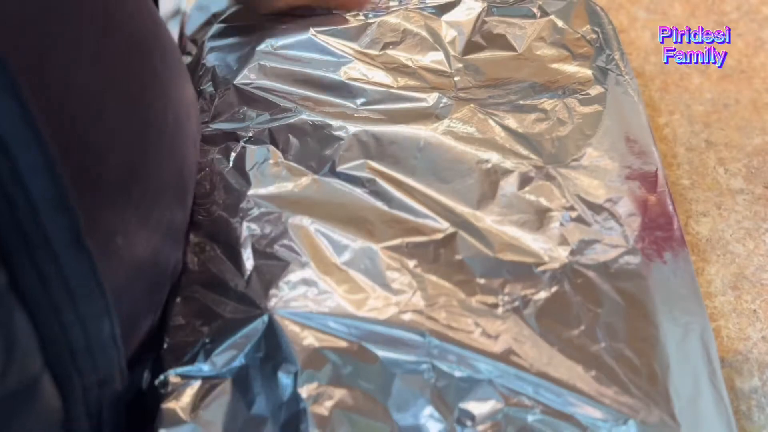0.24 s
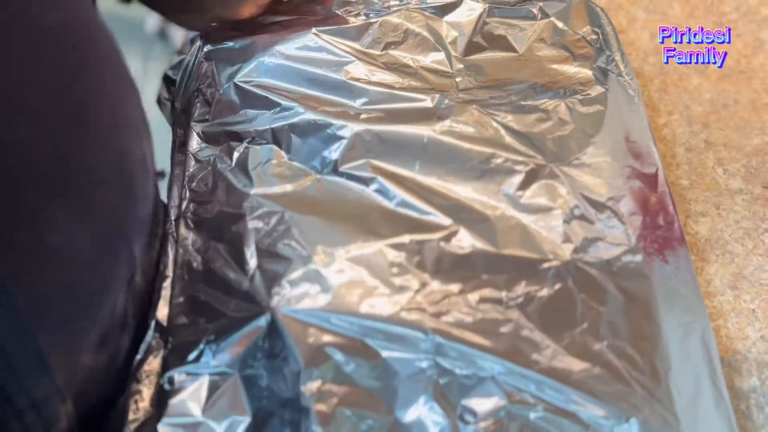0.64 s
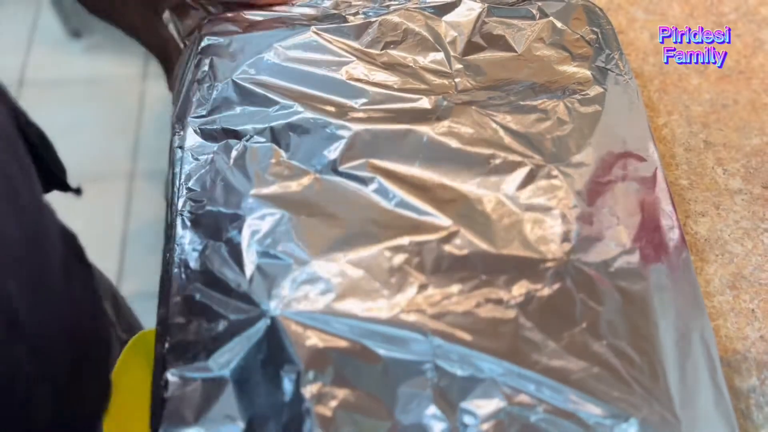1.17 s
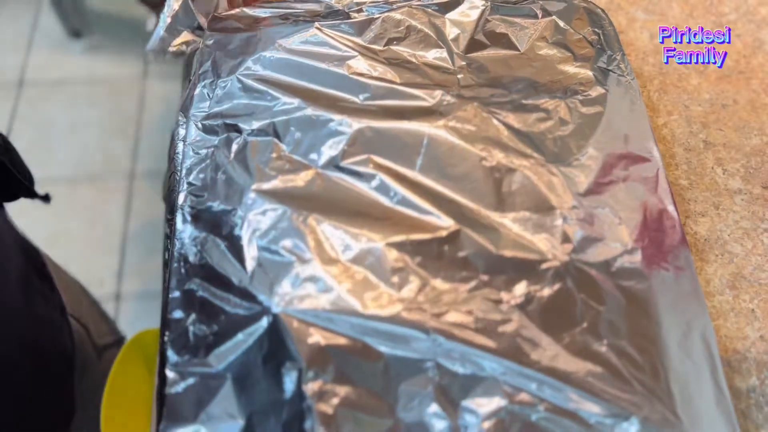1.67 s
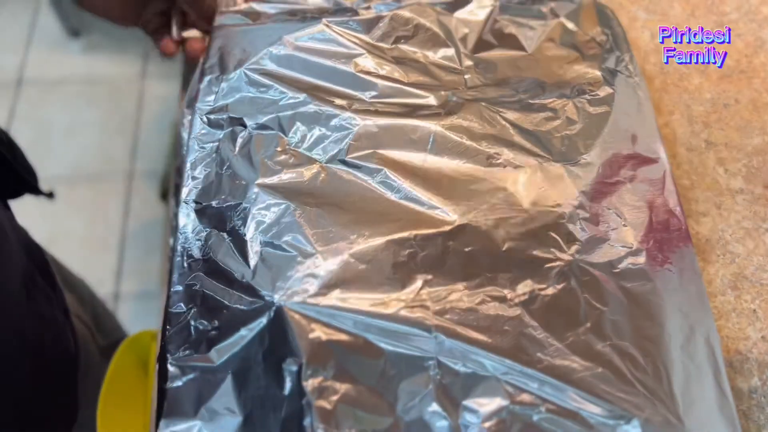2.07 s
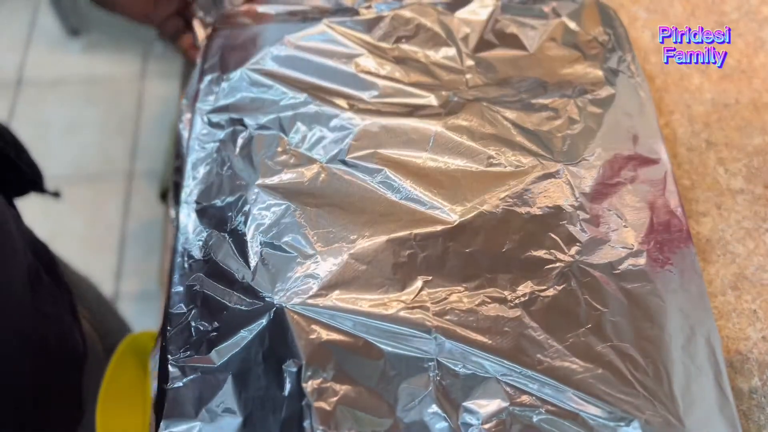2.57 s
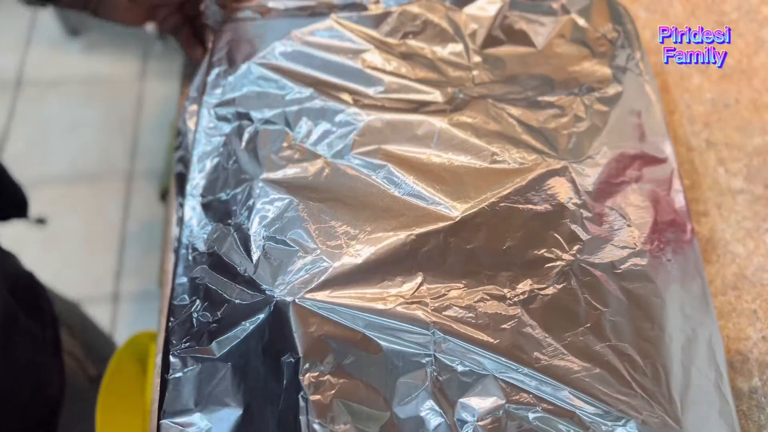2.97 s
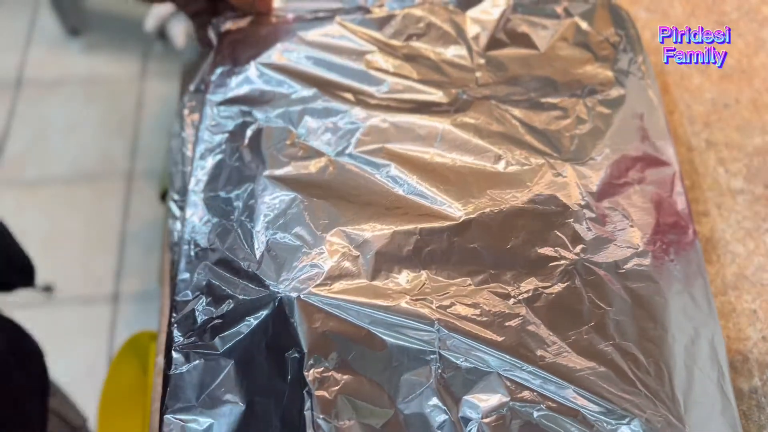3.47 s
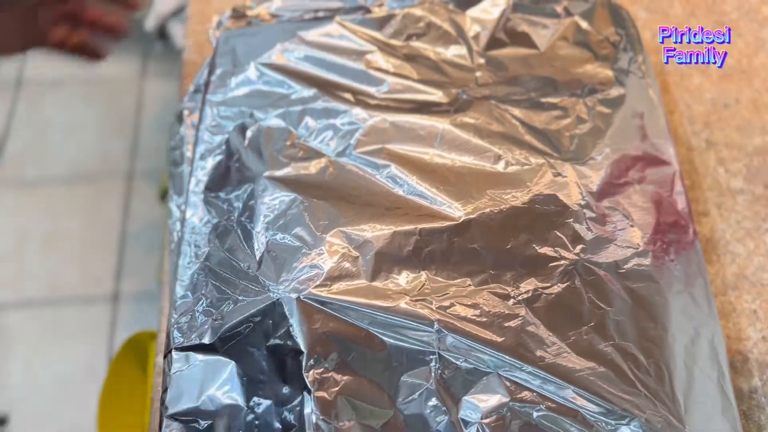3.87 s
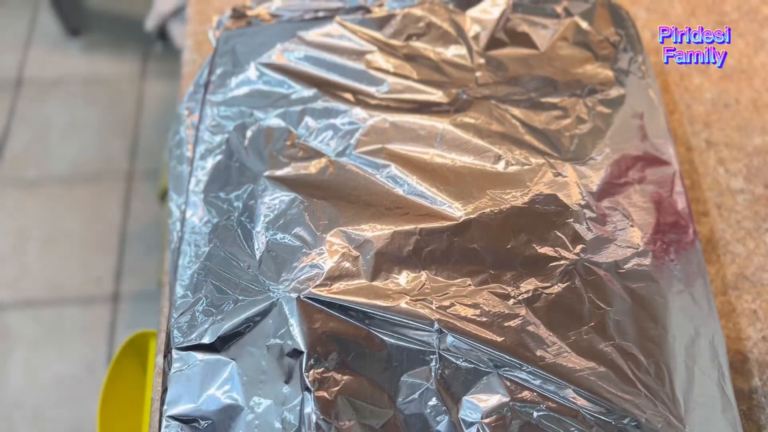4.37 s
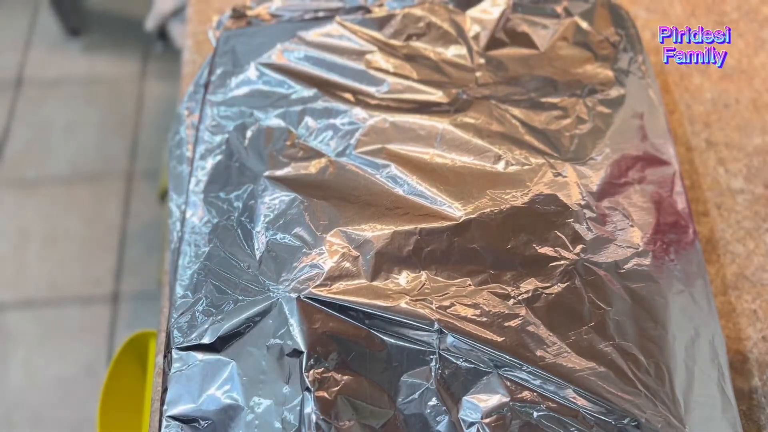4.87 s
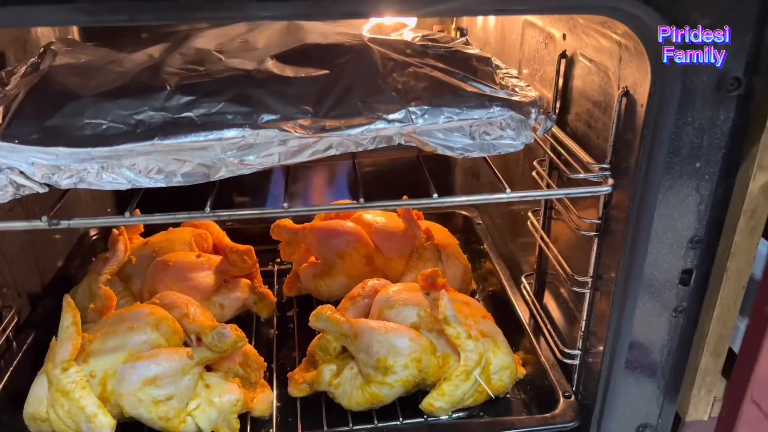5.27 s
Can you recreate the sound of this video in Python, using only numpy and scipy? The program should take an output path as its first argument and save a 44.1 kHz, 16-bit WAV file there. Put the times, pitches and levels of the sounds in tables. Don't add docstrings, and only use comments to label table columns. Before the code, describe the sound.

In a small kitchen, close stereo microphones catch hands crimping foil over a baking tray: dense bright crackle, sharp creases snapping, panels popping and low tray booms. After nearly four seconds it quietens to tiny ticks and soft worktop knocks over a faint fridge hum. At five seconds the scene cuts to an open gas oven, breathing softly, with a metal rack tapped once.

```python
import sys
import numpy as np
from scipy import signal
from scipy.fft import rfft, irfft, next_fast_len
from scipy.io import wavfile
from scipy.ndimage import uniform_filter1d

SR = 44100
rng = np.random.default_rng(int(sys.argv[2]) if len(sys.argv) > 2 else 0)


def gain_from_db(level_db):
    decades = np.asarray(level_db, float) / 20
    return 10 ** decades


def wrap_up_sound(samples):
    columns = np.atleast_2d(samples).T
    tamed = np.clip(columns, -1, 1)
    steps = np.round(tamed * 32767).astype(np.int16)
    wavfile.write(sys.argv[1], SR, steps)


N = 244314
CUT_S, RESUME_S = 4.976, 4.981
SWING_DB = 20


def evened(x):
    return x / np.sqrt(np.mean(x ** 2) + 1e-20)


def read(points, hz):
    f, value = np.transpose(points)
    return np.interp(np.log(hz + 1), np.log(f + 1), value)


def add(mix, s, sound):
    part = mix[..., round(s * SR):][..., :sound.shape[-1]]
    part += sound[..., :part.shape[-1]]


def ring(x, hz, width):
    r = np.exp(-np.pi * width / SR)
    return evened(signal.lfilter([1, 0, -1], [1, -2 * r * np.cos(2 * np.pi * hz / SR), r * r], x))


def hiss(points, low_hz):
    hz = np.fft.rfftfreq(N, 1 / SR)
    z = rfft(rng.standard_normal((2, N))) * gain_from_db(read(points, hz))
    return irfft(z, N) / np.std(irfft(z * (hz > low_hz), N))


def wander(per_s):
    size = int(SR / per_s)
    return evened(uniform_filter1d(uniform_filter1d(rng.standard_normal(N), size), size))


def swells(s, rise, fall, *levels_db):
    late = np.arange(0, N / SR, .001) - s[:, None]
    shape_db = -SWING_DB * np.maximum(-late / abs(rise[:, None]), late / abs(fall[:, None]))
    return gain_from_db(np.array(levels_db)) ** 2 @ gain_from_db(shape_db) ** 2


def per_sample(power):
    ms = np.arange(N) / SR * 1000
    return [np.interp(ms, np.arange(len(p)), 10 * np.log10(p + 1e-20)) for p in power]


def struck(rows, t60, scuff, second, third):
    out, t = np.zeros((2, N)), np.arange(6000) / SR
    for s, db, hz, pan_db, tick_db in rows:
        body = np.sin(2 * np.pi * hz * t)
        body = body + second * np.sin(2 * np.pi * 2.2 * hz * t)
        body = body + third * np.sin(2 * np.pi * 3.4 * hz * t)
        noise = rng.standard_normal((2, 2, len(t)))
        tick = ring(ring(noise[1], 1500, 1200.0), 1300, 1100.0)
        body = body + scuff * ring(noise[0], 0.9 * hz, 610.0) + gain_from_db(tick_db - 60 * t / 0.045) * tick
        level_db = db - 2.0 - 60 * t / t60 + np.array([[pan_db], [-pan_db]]) / 2
        add(out, s, gain_from_db(level_db) * body * np.minimum(t / 0.0022, 1))
    return out


# start_s [s], rustle_db [dB],
# large_facet_share_db [dB]
REST = [(0.0, -45, 0), (0.62, -55.5, -1), (0.83, -41, -1.5), (0.87, -34.5, -6), (1.62, -37.5, -4),
        (1.679, -47, -8), (1.755, -51, -7.5), (1.9, -35, -6.5), (2.05, -31.5, -8.5), (2.18, -48, -7),
        (2.5, -42.5, -4), (3.45, -46, -5), (3.78, -68, 5), (4.3, -66, -3), (4.5, -66, -2), (4.58, -79, 4.5),
        (4.73, -79, 6), (4.76, -63.5, -6), (4.97, -62.5, -9)]
# peak_s [s], level_db [dB], build_up_s [s], release_s [s], large_facet_share_db [dB]
SQUEEZES = [(0.0, -32, .02, 0.071, -1.5), (0.075, -37, 0.076, 0.11, -15), (0.23, -32.5, 0.39, 0.44, -0.5),
            (0.291, -27, 0.048, 0.36, -4.5), (0.45, -29, 0.087, 0.04, -12.5),
            (0.565, -36.5, 0.033, 0.062, -8), (0.728, -31.5, .2, 0.093, -3.5), (1.03, -30, 0.13, 0.28, -6),
            (1.41, -33.5, 0.29, 0.23, -7.5), (1.62, -38.5, 0.17, 0.033, -6),
            (1.79, -40.5, 0.04, 0.12, -5.5), (1.87, -32.5, 0.12, 0.14, -4.5), (1.972, -32, .02, .04, -9),
            (2.059, -26.5, 0.03, 0.093, -9), (2.33, -36.5, .04, .2, -10), (2.51, -36.5, 0.066, 0.3, -10),
            (2.61, -37, 0.11, 0.59, -7.5), (2.784, -31, 0.045, 0.032, -10.5),
            (2.89, -35.5, 0.11, 0.034, -3), (2.96, -36.5, 0.073, 0.3, -7.5), (3.111, -35, .012, 0.4, -5.5),
            (3.279, -34.5, 0.07, 0.032, -9), (3.42, -39, 0.017, 0.21, 1),
            (3.471, -35.5, 0.087, 0.19, -10.5), (3.9, -56.5, 0.055, 0.12, 6.5),
            (3.99, -56, 0.15, 0.13, 6.5), (4.2, -52.5, 0.23, .11, -3)]


def hands():
    s, db, rise, fall, share_db = np.transpose(SQUEEZES)
    at, rest_db, rest_share_db = np.transpose(REST)
    ms = np.arange(0, N / SR, .001)
    rest = [np.interp(ms, at, c) for c in (rest_db, rest_db + rest_share_db)]
    power = swells(s, rise, fall, db, db + share_db) + gain_from_db(np.array(rest)) ** 2
    crinkle_db, deep_db = per_sample(power)
    deep_db = deep_db - crinkle_db
    palm_db = -19 * (abs(np.arange(N) / SR - (3.72 + 4.35) / 2) < (4.35 - 3.72) / 2)
    return crinkle_db, deep_db, .5 * crinkle_db - 0.4 * deep_db + palm_db


# start_s [s], level_db [dB, peak], deep_db [dB, relative], length_s [s]
SNAPS = [(0.288, -18.5, -4, 0.0074), (0.314, -24, -7, 0.006), (0.34, -22.5, -9, 0.016),
         (0.439, -23, -12, 0.013), (0.567, -22, -27, 0.0033), (0.842, -21.5, -7, 0.018),
         (0.897, -25, -9, 0.0098), (0.945, -29, -14.5, 0.013), (1.025, -23, -7, 0.014),
         (1.129, -21, -5, 0.025), (1.147, -24, -10, 0.0083), (1.295, -26, -70, 0.016),
         (1.332, -21, -16, 0.012), (1.452, -23.5, -10, 0.0071), (1.52, -23, -13, 0.017),
         (1.559, -23, -18.5, 0.0071), (1.717, -37, -10, 0.019), (1.775, -23, -10, 0.012),
         (1.83, -25, -5.5, 0.04), (1.918, -28.5, -13, 0.0054), (1.964, -27, -8, 0.016),
         (2.042, -21.5, -13, 0.01), (2.178, -29, -6.5, 0.0062), (2.238, -35, -5.5, 0.058),
         (2.325, -30, -14, 0.01), (2.332, -22, -12, 0.015), (2.42, -32.5, -2, 0.0092),
         (2.463, -30, 1, 0.014), (2.509, -25, -14, 0.016), (2.561, -27, -16, 0.0057),
         (2.607, -44, 8, 0.015), (2.628, -32, 7.5, 0.014), (2.762, -28, -6, 0.019), (2.941, -32, -7, 0.008),
         (2.961, -24, -2, 0.015), (3.113, -23, -12, 0.0081), (3.232, -23, -15.5, 0.0065),
         (3.272, -27, -18, 0.0078), (3.337, -32, -12, 0.006), (3.368, -29.5, -1, 0.008),
         (3.414, -24.5, -15, 0.013), (3.453, -22.5, -5, 0.012), (3.69, -41, -17, 0.0068),
         (3.836, -48.5, 6, 0.03), (3.895, -53, 9.5, 0.017), (4.156, -43.5, -2, 0.018)]


def snap_power(fade_db=5.0, trim_db=-7.0):
    power, t = np.zeros((2, N)), np.arange(SR // 5) / SR
    for s, db, deep_db, length in SNAPS:
        level_db = np.array([[db], [db + deep_db]]) + trim_db - fade_db * t / max(length, .003)
        add(power, s - .001, gain_from_db(level_db) ** 2 * np.minimum(t / 0.0018, 1))
    return power


# pitch_hz [Hz], level_db [dB per Hz]
FOIL = [(300, -22), (600, -12), (1200, -5), (2000, -7), (3500, -4.5), (6200, -1), (8500, -4), (12000, -4.5),
        (16000, -8.5)]


def foil(per_s=420.0, size_db=3.0, biggest=3.8, cycles=6.5, clump_db=1.36, patch_db=1.89, count=31):
    crinkle_db, deep_db, fizz_db = hands()
    bright_snap, deep_snap = snap_power()
    clumps = clump_db * evened(uniform_filter1d(rng.standard_normal((3, N)), 250))
    bright_db = 10 * np.log10(gain_from_db(crinkle_db) ** 2 + bright_snap) + clumps[0]
    deep_db = 10 * np.log10(gain_from_db(crinkle_db + deep_db) ** 2 + deep_snap) + clumps[1] + 8.4
    fizz_db = bright_db + 0.54 * (fizz_db - np.median(fizz_db)) + .5 * clumps[2]
    pitches, out = np.geomspace(350, 16000, count), np.zeros((2, N))
    weight = gain_from_db(read(FOIL, pitches)) * np.sqrt(pitches)
    weight /= np.linalg.norm(weight[(pitches > 3000) & (pitches < 9000)])
    for hz, w in zip(pitches, weight):
        large, tiny = read([(1700, 1), (3600, 0)], hz), read([(8000, 0), (11000, 1)], hz)
        stress_db = large * deep_db + tiny * fizz_db + (1 - large - tiny) * bright_db
        hits = np.nonzero(rng.random((2, N)) < per_s * (hz / 3000) ** .6 / SR)
        n = len(hits[0])
        size = gain_from_db(size_db * np.minimum(rng.exponential(1, n), biggest)) * rng.choice([-1, 1], n)
        patch = patch_db * np.interp(hits[1], np.arange(90) * N / 89, rng.standard_normal(90))
        train = np.zeros((2, N))
        train[hits] = evened(size) * np.sqrt(2 * N / n) * gain_from_db(stress_db[hits[1]] + patch)
        u = np.arange(int(4 * cycles * SR / hz)) * hz / SR / cycles
        facet = np.sin(2 * np.pi * cycles * u) * u * np.exp(-3.0 * u)
        out += w * signal.oaconvolve(train, facet[None] / np.linalg.norm(facet), axes=1)[:, :N]
    return out * (np.arange(N) < CUT_S * SR)


def ticks(per_s=120.0, random_db=8.5, snap_db=-9.0):
    level_db = hands()[0] + random_db + 1.77 * rng.standard_normal((2, N))
    train = (rng.random((2, N)) < per_s / SR) * gain_from_db(level_db)
    for s, db, deep_db, length in SNAPS:
        train[:, round(s * SR)] += gain_from_db(db + snap_db)
    t = np.arange(200) / SR
    tones = [(6300, 0.66), (2300, 0.83), (11000, 1.2)]  # pitch_hz, share
    click = np.exp(-t / 0.00011) * sum(share * np.sin(2 * np.pi * hz * t) for hz, share in tones)
    return signal.oaconvolve(train, click[None], axes=1)[:, :N] * (np.arange(N) < CUT_S * SR)


# peak_s [s], worktop_thud_db [dB], tray_boom_db [dB], length_s [s]
PUSHES = [(0.0, -63, -55.5, 0.17), (0.18, -51, -49.5, .2), (0.244, -56, -47.5, .15),
          (0.3, -43, -41.5, 0.077), (0.345, -45.5, -56, 0.24), (0.48, -63, -50.5, 0.13),
          (0.55, -71, -66, 0.13), (0.75, -59, -49, 0.057), (0.865, -50.5, -43.5, 0.079),
          (0.92, -48.5, -53, 0.11), (1.058, -61, -46, 0.11), (1.447, -65.5, -59.5, 0.9),
          (1.876, -64, -44.5, 0.11), (1.99, -74, -53.5, 0.16), (2.1, -62, -70, 0.11),
          (2.345, -61, -62, .15), (2.422, -65, -60.5, 0.52), (2.657, -55, -51, 0.12), (2.95, -58, -54, 0.2),
          (3.126, -67, -52.5, 0.13), (3.308, -51.5, -54, 0.094), (3.443, -70, -48.5, 0.12),
          (3.48, -57.5, -49.5, 0.16), (3.822, -63.5, -53, 0.14), (4.16, -59, -54.5, 0.083),
          (4.218, -58, -78, .1), (4.944, -64, -73, .12)]


def pushes():
    s, thud_db, boom_db, length = np.transpose(PUSHES)
    still_db = np.array([[-74], [-80]])
    rise = 0.8 * length
    return per_sample(swells(s, rise, length, thud_db, boom_db) + gain_from_db(still_db) ** 2)


# pitch_hz [Hz], width_hz [Hz], level_db [dB]
TRAY = [(55, 59, 2), (154.4, 36.6, 2), (225, 330, 1.5)]


def tray():
    thud_db, boom_db = pushes()
    shakes = rng.standard_normal((3, 2, N))
    levels = (thud_db, boom_db - 4.5, boom_db - 3.5)
    out = np.zeros((2, N))
    for shake, level, (hz, w, db) in zip(shakes, levels, TRAY):
        out += gain_from_db(db + level) * ring(ring(shake, hz, w), hz, 3.2 * w)
    return out


# pitch_hz [Hz], level_db [dB]
WHINE = [(193.8, -73.5), (247.6, -74), (393.0, -67), (489.9, -69), (538.3, -79), (592.2, -72)]


def fridge(hum_hz=100.3, hum_db=-57, waver_hz=1.3, throb_db=-0.7):
    hum_level = gain_from_db(hum_db + throb_db * wander(42.0) + 0.7 * wander(2.5))
    turns = np.cumsum(hum_hz + waver_hz * wander(12.8)) / SR
    hum = np.sqrt(2) * hum_level * np.sin(2 * np.pi * turns)
    drift = np.cumsum(1 + 0.0028 * wander(6.8)) / SR
    whine = np.zeros((2, N))
    for hz, db in WHINE:
        phase = rng.uniform(0, 7.6, (2, 1))
        whine += gain_from_db(db + 0.74 * wander(16.0)) * np.sin(2 * np.pi * hz * drift + phase)
    return hum, whine


# pitch_hz [Hz], level_db [dB per Hz]
KITCHEN = [(76, -55.5), (130, -12.5), (309, -19), (394, -11.5), (418, -19), (543, -18), (706, -29.5),
           (1140, -43.5), (1820, -15.5), (2890, -38), (16000, -43.5)]


def kitchen_air(level_db=-66):
    return gain_from_db(level_db) * hiss(KITCHEN, 140)


# start_s [s], level_db [dB, peak], pitch_hz [Hz, centre], t60_s [s]
SETTLE = [(0.075, -34, 12000, .08), (0.439, -26, 12500, 0.13), (0.945, -26, 12500, .12),
          (1.763, -37, 11500, 0.087), (1.918, -30, 12000, .05), (1.963, -25.5, 12500, .15),
          (2.323, -33, 12500, .08), (3.103, -35, 12500, .08), (3.272, -27, 10500, 0.076),
          (3.415, -30, 11550, .08), (3.689, -33, 12100, .026), (3.692, -47, 4200, .04),
          (3.793, -52, 4000, .04), (3.839, -49, 3500, .026), (3.888, -46, 1520, .05),
          (3.935, -45.5, 4200, 0.052), (3.985, -46, 2000, .05), (4.057, -49, 3800, .03),
          (4.094, -47, 5500, .03), (4.15, -49, 700, .04)]


def settle(breadth=0.48):
    out, t = np.zeros((2, N)), np.arange(6000) / SR
    for s, db, hz, t60 in SETTLE:
        flick = ring(rng.standard_normal((2, len(t))), hz, breadth * hz)
        add(out, s, gain_from_db(db - 60 * t / t60) * flick * np.minimum(t / 0.0018, 1))
    return out


# [dB, relative]
POPS = [(0.165, -24, 1237, 2, -7), (0.176, -25, 1200, 0, -10), (0.288, -19, 1073, 3.5, -11.5),
        (0.337, -26, 1250, -6, -2), (0.413, -25, 1210, -1.5, -3.5), (0.722, -30, 1080, 0, -10),
        (0.894, -31, 1125, 7, -4.5), (1.086, -33, 1120, 2, -7.5), (1.307, -30, 1570, 4, -8),
        (1.865, -29.5, 1416, -1, -5), (2.455, -33.5, 1755, 3, -10), (2.958, -31, 1130, 6, -22)]


def pops():
    return struck(POPS, 0.046, 0.99, 0.15, 0.052)


# [dB, relative]
KNOCKS = [
    (3.793, -35, 480, 7.5, -15),
    (3.972, -33, 387, -4, 3),
    (4.133, -38, 595, 2.5, -19),
    (4.918, -29, 415, 3, -14),
    (5.149, -58, 385, 10, -4),
    (5.524, -45, 416, 4, 8.5),
]


def knocks():
    return struck(KNOCKS, 0.019, 0.73, 0.29, 0.15)


# pitch_hz [Hz], level_db [dB per Hz]
OVEN = [(18, -41), (30, -34), (48, 3), (170, -3), (221, -15.5), (287, -10.5), (437, -11.5), (702, -18.5),
        (1630, -8.5), (3220, -23), (6550, -19.5), (9970, -32.5), (12600, -23), (16000, -26)]
# pitch_hz [Hz], width_hz [Hz], level_db [dB]
JETS = [(1610, 250, -7), (3660, 150, -14.5), (5730, 300, -14.5), (6610, 250, -14), (12700, 400, -15)]


def burner(level_db=-56.5):
    jets = np.zeros((2, N))
    for hz, w, db in JETS:
        jets += gain_from_db(db) * ring(rng.standard_normal((2, N)), hz, w)
    roar = hiss(OVEN, 130) * gain_from_db(1.1 * wander(16.0))
    return gain_from_db(level_db) * (roar + gain_from_db(1.5 * wander(13.0)) * jets)


def rack_slide(peak_s=5.24, rise_s=0.12, fall_s=.04, level_db=-66):
    late = np.arange(N) / SR - peak_s
    scrape = ring(ring(rng.standard_normal((2, N)), 1900, 900.0), 1900, 1200.0)
    return gain_from_db(level_db - SWING_DB * np.maximum(-late / rise_s, late / fall_s)) * scrape


# pitch_hz [Hz], level_db [dB], t60_s [s]
RACK = [(544, -9.5, 0.14), (755, -22, 0.55), (1000, -19, 0.51), (1384, -5, 0.26), (1647, -4, 0.18),
        (1933, -8, 0.48), (2088, -1.5, 0.16), (2260, -6, 0.12), (2456, 2, 0.11), (2766, 3, 0.071),
        (3040, -7, 0.1), (4160, -10, 0.055), (5319, -11, 0.068), (6568, -22, 0.12)]
# delay_s [s], level_db [dB]
BOUNCES = [
    (-0.0075, -26),
    (0.0035, -2),
    (0.0165, -13),
    (0.062, -18),
]


def rack(tap_s=5.2815, tap_db=-22.5, lead_s=.01, crack_db=1.0, rattle_db=-8.0, thud_db=-29.5,
         spread=0.014, shorter=0.9, dull_hz=6200):
    out, t = np.zeros((2, N)), np.arange(SR // 3) / SR
    bars = rng.uniform(-1.17, 1, (len(RACK), 2, 2, 3, 1))
    modes = np.zeros((2, len(t)))
    for (tune, phase), (hz, db, t60) in zip(bars, RACK):
        cluster = np.sin(2 * np.pi * hz * (1 + spread * tune) * t + np.pi * phase).sum(1) / np.sqrt(3)
        modes += gain_from_db(db - 60 * t / (shorter * t60)) * cluster
    noise = rng.standard_normal((2, 2, len(t)))
    crack = gain_from_db(crack_db - 60 * t / 0.032) * ring(ring(noise[0], 3200, 2060.0), 4170, 3700.0)
    rattle = gain_from_db(rattle_db - 60 * t / 0.27) * ring(ring(noise[1], 1900, 1600.0), 1800, 2200.0)
    thud = gain_from_db(thud_db - 60 * t / 0.51) * ring(noise[0], 270, 130.0)
    first = gain_from_db(-3.5) * (modes + crack + rattle + thud) * np.minimum(t / 0.0008, 1)
    tap = np.zeros_like(first)
    for delay, db in [(0, 0)] + BOUNCES:
        add(tap, delay + lead_s, gain_from_db(db) * first)
    tap = signal.lfilter(*signal.butter(2, dull_hz, fs=SR), tap)
    add(out, tap_s - lead_s, gain_from_db(tap_db + np.array([[2.5], [-2.5]])) * tap)
    return out


# pitch_hz [Hz], t60_s [s]
WALLS = [(250, 0.29), (1000, 0.16), (3000, 0.25), (8000, 0.21), (15000, 0.13)]


def kitchen_echo(x):
    taps = np.zeros((2, SR // 2))
    slots = np.arange(150, SR // 2 - 20, 20)
    at = slots + rng.integers(0, 20, (2, len(slots)))
    np.put_along_axis(taps, at, rng.choice([-1., 1.], at.shape), 1)
    hz, t, z = signal.stft(taps, SR, nperseg=256)
    tail = signal.istft(z * gain_from_db(-60 * t / read(WALLS, hz)[:, None]), SR, nperseg=256)[1]
    return signal.fftconvolve(x, tail / np.linalg.norm(tail[0]), axes=1)[:, :N]


def scene():
    t = np.arange(N) / SR
    near = foil() + ticks() + settle() + pops()
    hum, whine = fridge()
    knock, tap = knocks(), rack()
    echo = kitchen_echo(gain_from_db(-7.0) * near + gain_from_db(-12.0) * tap + gain_from_db(-6.0) * knock)
    worktop = gain_from_db(-1.0) * near + tray() + hum + kitchen_air()
    oven = burner() + rack_slide() + tap
    before = np.clip((CUT_S - t) / 0.0044, 0, 1)
    after = np.clip((t - RESUME_S) / 0.0048, 0, 1)
    return before * worktop + after * oven + (before + after) * (whine + echo + knock)


def band_limit(x):
    return signal.sosfilt(signal.butter(12, 17100, fs=SR, output="sos"), x)


# pitch_hz [Hz], left_right_db [dB]
LEFT_LEAD = [(60, 2), (110, -3.5), (200, -1), (380, 2), (700, -2.5), (1290, 3), (2380, -1), (4400, 2.0),
             (8120, 2), (15000, -2.5)]
# pitch_hz [Hz], share [0-1]
MONO_BASS = [(100, 1), (300, 0.6), (1000, 0.057), (1600, 0.044)]
# pitch_hz [Hz], share [0-1]
SPREAD_TOP = [(5000, .1), (7500, .4), (8600, .55), (9600, .9), (16000, .92)]


def record(dry, low_cut_hz=48, in_step_hz=8570, comb_hz=3480):
    size = next_fast_len(N + SR // 10)
    hz = np.fft.rfftfreq(size, 1 / SR)
    left, right = rfft(dry, size) / np.sqrt(1 + (low_cut_hz / (hz + 1)) ** 4)
    bass = np.clip(read(MONO_BASS, hz) * (hz < 2500), 0, 1)
    top = np.clip(read(SPREAD_TOP, hz) * (hz >= 2500), 0, 1)
    copy = bass + top * np.exp(2j * np.pi * (hz - in_step_hz) / comb_hz)
    right = copy * left + np.sqrt(1 - (bass + top) ** 2) * right
    tilt = gain_from_db(read(LEFT_LEAD, hz) / 2)
    pair = irfft(np.array([left * tilt, right / tilt]), size)[:, :N]
    return band_limit(pair)


dry = scene()
out = record(dry)
wrap_up_sound(out)
```